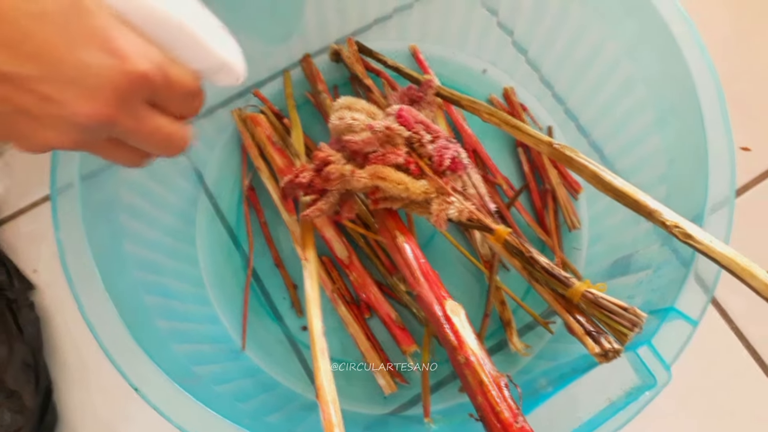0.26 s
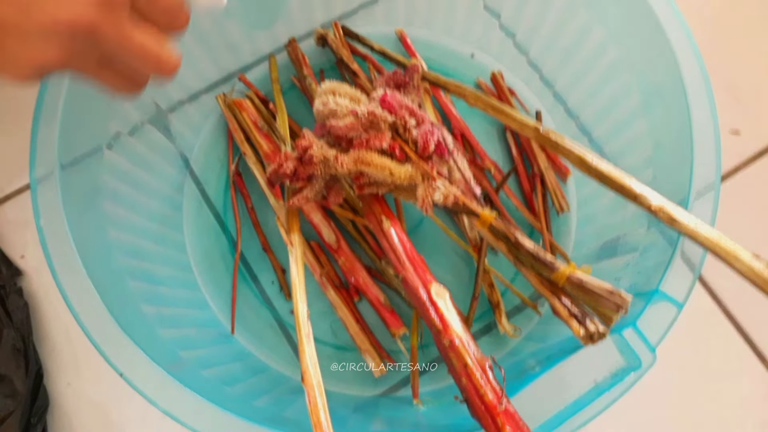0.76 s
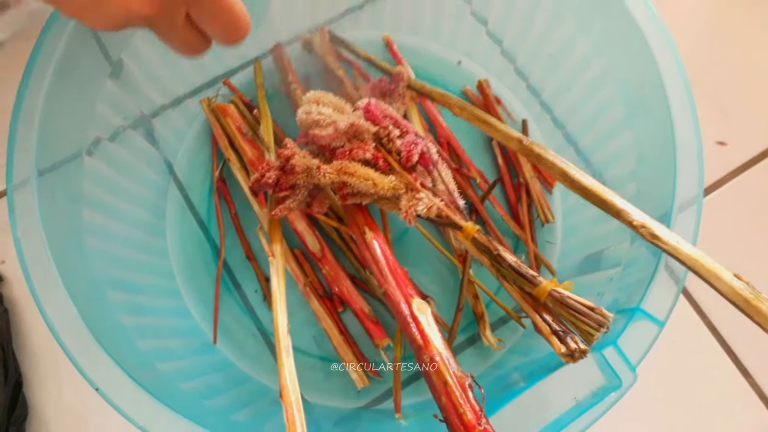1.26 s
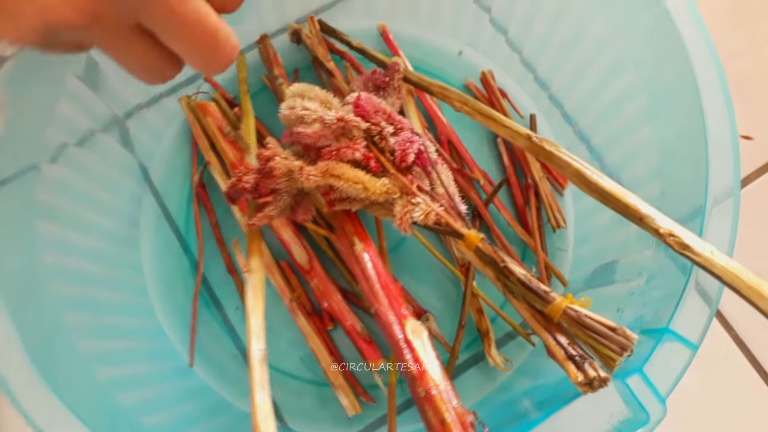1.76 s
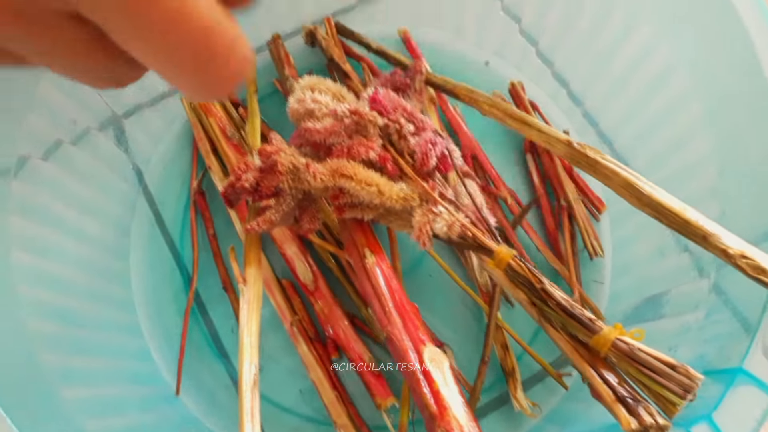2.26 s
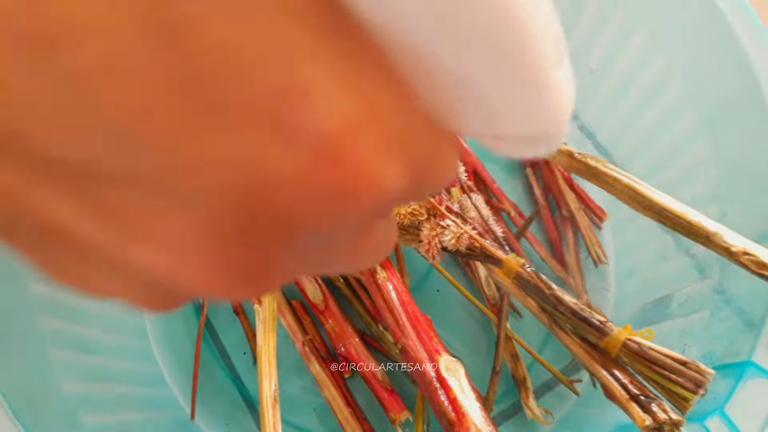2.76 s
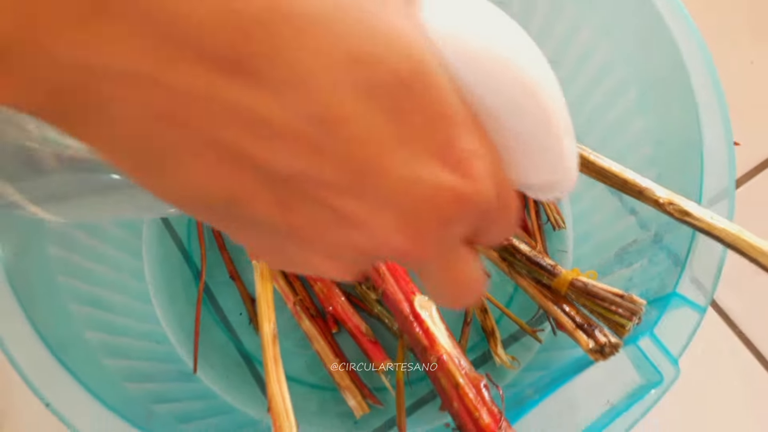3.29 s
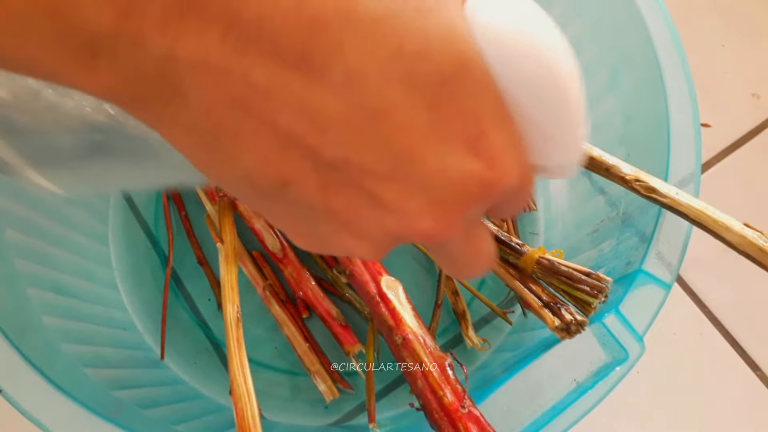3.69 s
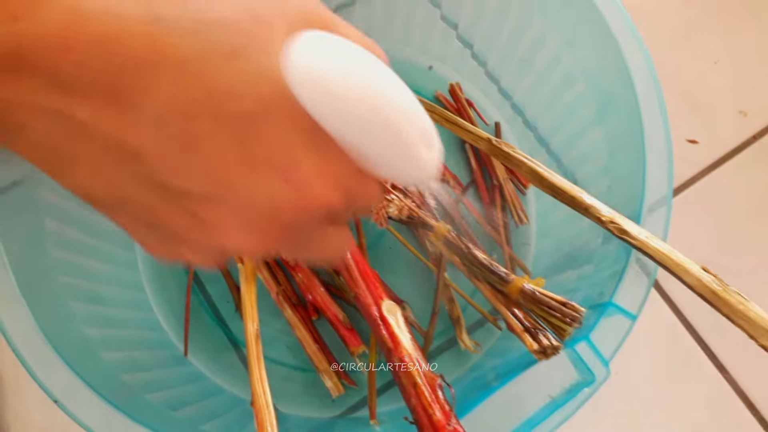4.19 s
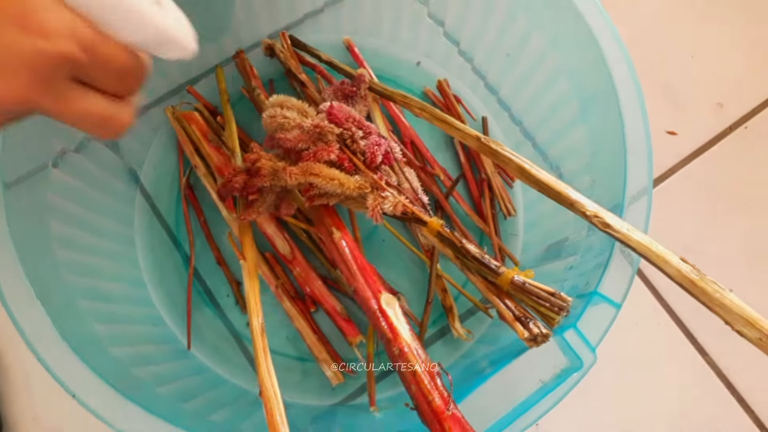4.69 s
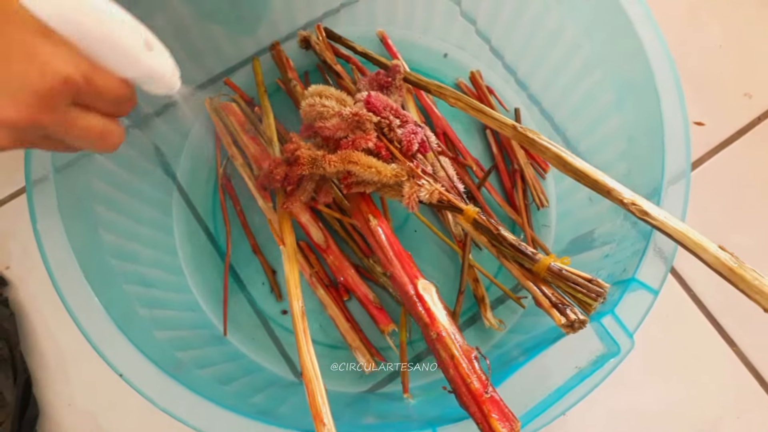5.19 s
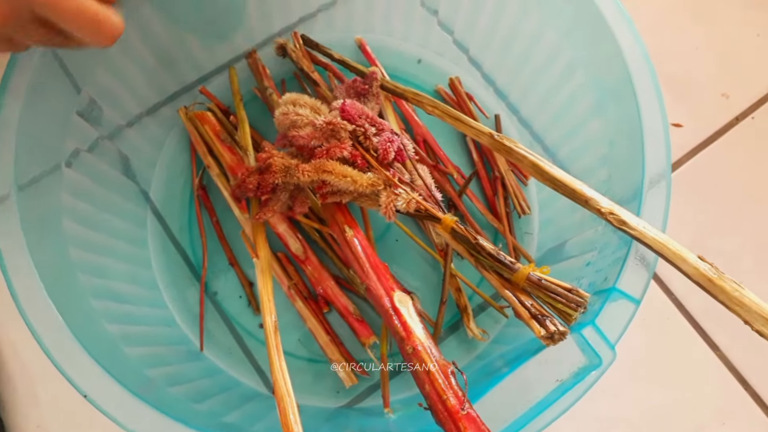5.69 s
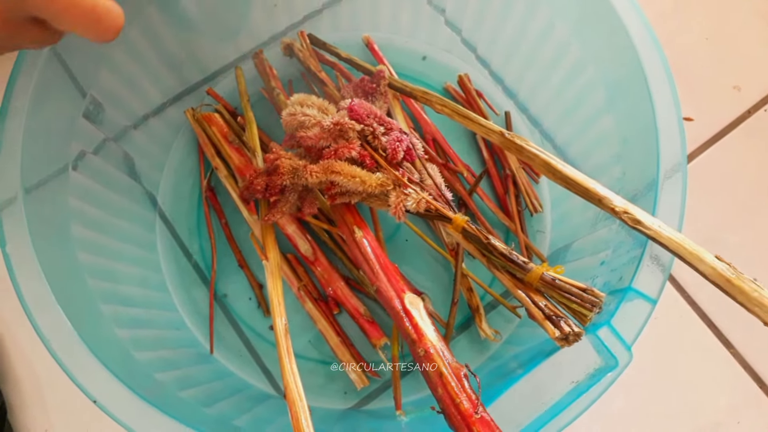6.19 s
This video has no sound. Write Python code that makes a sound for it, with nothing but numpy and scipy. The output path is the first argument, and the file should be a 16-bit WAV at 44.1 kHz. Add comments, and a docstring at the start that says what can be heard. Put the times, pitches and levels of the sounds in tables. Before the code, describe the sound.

A plastic trigger sprayer is pumped eighteen times, close to a phone microphone in a tiled room with a short hard echo. Squirts at 0, 0.4 and 0.8 s are the loudest and longest, nearly 0.2 s of bright, fizzing hiss. From 1.25 to 2.8 s six shorter, softer squirts follow about every 0.3 s, with sharp nozzle spits and hollow plastic knocks, strongest near 1.7 s. Between 2.8 and 3.4 s spraying pauses: clicks, rattles, a sucking refill hiss and a thin high whistle around 3.2 s. Squirts resume at 3.4 s, roughly every 0.35 s, until 6.3 s, with clacks at 4.2, 5.1, 5.4 and 6 s. Each sprays droplets that patter on stems and dully ring a plastic basin. Tiny stray drips tick throughout; faint room rumble and a distant wavering motor hum, changing pitch at 1.24 s, lie beneath.

```python
"""Bright hissing squirts come first: a plastic trigger bottle is pumped eighteen times, close to a phone in a tiled room.
Each squeeze gates bands of turbulence noise: the jet, and drops that patter on plant stems and ring a plastic basin.
Knocks excite decaying plastic modes with noise bursts on top; spits, ticks and refill whistles are narrower noise.
Stray drops are short sines; far off, coloured room noise and a wavering motor hum of sines lie underneath."""
import sys
import numpy as np
from scipy import signal
from scipy.fft import rfft, irfft
from scipy.io import wavfile
from scipy.ndimage import uniform_filter1d, map_coordinates

SR = 44100
rng = np.random.default_rng(int(sys.argv[2]) if len(sys.argv) > 2 else 0)


def to_wav(s):
    """Save 16-bit WAV."""
    ch = np.atleast_2d(s).T  # columns
    pcm = np.round(np.clip(ch, -1, 1) * 32767)  # PCM
    wavfile.write(sys.argv[1], SR, pcm.astype(np.int16))


N = 284445
HIGHEST_HZ = 0.45 * SR  # upper edge of the widest bands


def undb(db):
    """Level as the logarithm of amplitude: decibels to gain."""
    return 10 ** (np.asarray(db) / 20)


def unit(x):
    """Normalisation by mean power: scale to rms 1."""
    return x / np.sqrt(np.mean(x ** 2))


def decay(t, t60_s):
    """Exponential damping: the amplitude falls by 60 dB in t60_s."""
    return np.exp(-np.log(1000) * t / t60_s)


def coloured(spectrum):
    """Spectral shaping: white noise weighted by levels interpolated over log frequency."""
    hz, db = np.transpose(spectrum)
    f = np.arange(N // 2 + 1) * SR / N + 1
    gain = undb(np.interp(np.log(f), np.log(hz), db))
    return irfft(rfft(rng.standard_normal(N)) * gain, N)


def band(x, lo_hz, hi_hz, order=4):
    """Band limitation by a Butterworth band-pass."""
    return signal.sosfilt(signal.butter(order, [lo_hz, hi_hz], "band", fs=SR, output="sos"), x)


def flicker(rate_hz, db):
    """Random amplitude modulation: a gain that wanders by about db at the given rate."""
    k = int(SR / rate_hz)
    steps = np.repeat(rng.standard_normal(N // k + 1), k)
    return undb(db * 1.14 * uniform_filter1d(steps, k)[:N])


def add(track, s, x):
    """Superposition: mix x into the track at time s."""
    i = int(s * SR)
    track[i:i + len(x)] += x[:N - i]


def room_noise():
    """Broadband ambient noise: random pressure with a fixed spectrum and a slow swell."""
    # ambient noise spectrum: (frequency [Hz], relative density [dB per Hz])
    room_spectrum = [(15, -57), (25, -6), (169, 24.5), (351, 13.5), (485, 24), (555, 15), (707, 17),
                     (809, 19), (1770, -22), (2190, -14), (3030, -28), (7790, -18), (15700, -37)]
    room_db = -61.5
    return undb(room_db) * unit(coloured(room_spectrum)) * flicker(2.5, 6.0)


def rumble():
    """Low-frequency ambience: band-limited noise whose level follows a contour."""
    # low room rumble: (time [s], level [dB])
    rumble_levels = [(0, -51.5), (.5, -60.5), (1.2, -57.5), (1.26, -63), (2, -57.5), (2.5, -63.5),
                     (6.45, -68.5)]
    t = np.arange(N) / SR
    low_noise = unit(band(rng.standard_normal(N), 81, 376, order=2))
    return undb(np.interp(t, *np.transpose(rumble_levels))) * low_noise


def motor_hum():
    """Periodic radiation of a small motor: sines wavering in pitch and level."""
    # hum tones, a step higher after the third squeeze: (start [s], stop [s], frequency [Hz], level [dB])
    hum_tones = [(0, 1.24, 161.5, -64), (0, 1.24, 323, -67), (0, 1.24, 473.7, -61.5), (.5, 1.24, 576, -67),
                 (1.24, 6.45, 242.2, -66), (1.24, 6.45, 484.5, -68), (1.24, 6.45, 711.5, -60.5),
                 (1.85, 2.22, 163, -55)]
    out, t = np.zeros(N), np.arange(N) / SR
    for start, stop, hz, db in hum_tones:
        on = np.clip(np.minimum(t - start, stop - t) / 0.0055, 0, 1)
        level = np.sqrt(2) * undb(db) * on * flicker(12, 2)  # sqrt(2): the level is the rms
        phase = 2 * np.pi * hz * np.cumsum(flicker(15, .008)) / SR
        out += level * np.sin(phase)
    return out


def drips():
    """Damped oscillation: stray drops fall from the stems, each a brief ring at its own pitch."""
    out, t = np.zeros(N), np.arange(int(.02 * SR)) / SR
    drops_per_s = 35
    for when, pitch, size in rng.random((int(drops_per_s * N / SR), 3)):
        hz = 1500 * 4 ** pitch
        db = -62 - 4.0 * np.log(.15 + .85 * size)  # few drops are loud
        add(out, when * N / SR, undb(db) * np.sin(2 * np.pi * hz * t) * np.exp(-t * hz / 5))
    return out


def whistles():
    """Narrow-band flow noise: air drawn past the valve on the refill sings."""
    # refill whistles: (start [s], stop [s], centre [Hz], width [Hz], level [dB])
    whistle_events = [(3.18, 3.28, 4620, 270, -51), (5.68, 5.79, 3600, 130, -65),
                      (4.66, 4.71, 2115, 250, -61)]
    out = np.zeros(N)
    for start, stop, hz, width_hz, db in whistle_events:
        n = int((stop - start) * SR)
        tone = unit(band(rng.standard_normal(n), hz - width_hz / 2, hz + width_hz / 2, order=2))
        add(out, start, undb(db) * tone * np.hanning(n) ** 0.27)
    return out


def spits_and_ticks():
    """Transient excitation: bursts of noise around their own centre die away exponentially."""
    # the nozzle spits just before the jet: (time [s], level [dB])
    spit_events = [(1.2492, -19.5), (1.5297, -20), (1.8365, -20), (2.1136, -23), (2.4033, -19),
                   (5.161, -24), (5.498, -24), (5.818, -22.5), (6.1591, -29), (6.1696, -25)]
    # small ticks of trigger and spring: (time [s], level [dB], centre [Hz])
    tick_events = [(0.275, -34.5, 3950), (0.353, -56, 5630), (1.1002, -32, 5540), (1.1418, -35, 4600),
                   (1.196, -35.5, 4200), (1.2074, -45, 12200), (1.5052, -41, 5080), (2.9454, -40, 7700),
                   (3.0233, -24.5, 6200), (3.039, -32, 8140), (3.165, -33.5, 8260), (3.266, -37, 7230),
                   (3.589, -38, 7500), (3.602, -37, 6240), (3.6556, -43, 7800), (3.721, -43, 11500),
                   (4.3785, -40, 8400), (4.7294, -43, 7460), (5.1372, -42, 12800), (5.6945, -42, 6700),
                   (5.745, -45, 7000), (6.129, -49, 5760)]
    spit_hz, spit_t60_s, tick_t60_s = 12200, 0.015, 0.02
    events = [(s, db, spit_hz, spit_t60_s) for s, db in spit_events]
    events += [(s, db, hz, tick_t60_s) for s, db, hz in tick_events]
    out, t = np.zeros(N), np.arange(int(0.041 * SR)) / SR
    for s, db, hz, t60_s in events:
        noise = rng.standard_normal(len(t))
        centre = unit(band(noise, hz * 0.84, hz * 1.35, order=1))
        broad = unit(band(noise, 3700, HIGHEST_HZ, order=1))
        add(out, s, undb(db) * (centre + 0.2 * broad) * decay(t, t60_s))
    return out


def ring(part_db, t):
    """Modal superposition: where the blow lands sets how strongly each damped mode rings."""
    # plastic modes of bottle and trigger: (frequency [Hz], relative level [dB], t60 [s])
    bottle_modes = [(307, -4, .04), (415, -1, .035), (484, 0, .03), (590, -3, .025), (690, -2, .03),
                    (899, -4, .025), (1087, 0, .03), (1238, -4, .025), (1460, -6, .02), (1820, -4, .012),
                    (2070, 0, .018), (2250, -3, .014), (2580, -3, .014), (2890, 0, .014), (3340, -2, .012),
                    (3620, -3, .012)]
    # frequencies between which the part levels are interpolated: (frequency [Hz])
    parts_hz = [500, 1100, 2100, 3100]
    hz, db, t60_s = np.array(bottle_modes).T[:, :, None]
    level_chance, pitch_chance = rng.standard_normal((2, len(bottle_modes), 1))
    db = db + np.interp(np.log(hz), np.log(parts_hz), part_db) + np.clip(2.5 * level_chance, -4, 4)
    tones = np.sin(2 * np.pi * hz * (1 + 0.047 * pitch_chance) * t)
    return np.sum(undb(db) * decay(t, t60_s) * tones, 0)


def knocks():
    """Impact excitation: a blow and its loose rattle ring the bottle, with noise from contact and liquid."""
    # trigger and bottle knocks: (time [s], head level [dB],
    # then relative to the head: body [dB], shell [dB], trigger [dB], crack [dB])
    knock_events = [(0.684, -50, -12, -5, 5, 11.5), (0.694, -43, -10, -11, 6, -2),
                    (0.767, -50, -7, 7, 7, 3), (1.196, -47.5, -2, 0, 4, -14),
                    (1.479, -34, -7.5, 1.5, -19, 1), (1.492, -41.5, -4, -4, -6, -4),
                    (1.687, -20.5, -10.5, -3, -10, -9), (1.713, -30, -6, -29, -30, -27),
                    (1.726, -44, 3, -24, -19, -19), (1.78, -38.5, -11, 9, 13.5, 1),
                    (1.815, -27, -9, 5, -11, -3), (2.038, -36, -12, 5, -12, -9),
                    (2.085, -38, -6, 3.5, -12, -8), (2.184, -40, -23, 2.5, -6, 14),
                    (2.24, -32.5, -4.5, 1, -13, 3), (2.359, -24.5, -11, -2.5, -6, -1),
                    (2.381, -31, -6.5, -7, -5, -11), (2.573, -30, -9.5, -5, -20, -15),
                    (2.902, -51, -22, 14, 2, 20), (2.923, -44, -27, 7, -3, 10),
                    (2.968, -39.5, -3, -13, -19, 6), (2.976, -26.5, -12, 1, -25, 1.5),
                    (2.983, -42, -6, -20, -18, -14), (3.107, -42.5, -9, 0, -10, 11),
                    (3.113, -27.5, -15, -0.5, -22, 0.5), (3.12, -30.5, 5, -26, -20, -13),
                    (3.127, -43, 2, -16, -10, -6), (3.548, -53, -14, 10, -11, 5),
                    (3.667, -49, -9, 10, -5, 2), (3.719, -45.5, -3, -16, -15, -16),
                    (4.007, -41.5, -32, -20, -26, -3), (4.046, -60, -6.5, 16, -8, 14),
                    (4.211, -23.5, 3.5, -16, -20, -20), (4.304, -40, -16, -2, -17, 7),
                    (4.413, -57.5, -13, 8, 8, 16), (4.765, -45, -15, 1, -16, 2),
                    (5.057, -29.5, -8.5, 2, -21, -6), (5.067, -39, -1, 1, 2, 12),
                    (5.432, -25, -3, -7, -12, -8), (5.452, -27.5, -12, -1.5, -5, -1),
                    (5.65, -29.5, -4.5, -14, -22, -2), (5.764, -27.5, -8, -16, -29, -16),
                    (5.783, -38, -10, -4, -4, -2), (5.971, -25, -8, -10, -21, -17),
                    (6.034, -34, -2.5, -2, -7, -10), (6.321, -28.5, -13, -1.5, -16, -29),
                    (6.43, -41, -6, 4.5, -9, -0.5)]
    rattle_t60_s, looseness, contact_s, scrape_db = 0.2, 0.61, 0.00072, -14
    wash_db, wash_t60_s = -19.5, 0.19
    snap_db, snap_s, snap_db_per_db = 6.5, 0.0011, 0.37

    out, t = np.zeros(N), np.arange(int(.15 * SR)) / SR
    fade, push = decay(t, rattle_t60_s), np.minimum(t / contact_s, 1)

    def noise(lo_hz, hi_hz):
        """Band-limited random excitation at rms 1."""
        return unit(band(rng.standard_normal(len(t)), lo_hz, hi_hz, order=1))

    for s, db, body_db, shell_db, trigger_db, crack_db in knock_events:
        hit_chance, strength = rng.random((2, len(t)))
        # a few clear rebounds, 180 per second on average, over a fine chatter
        blows = looseness * fade * (2 * strength - 1) * ((hit_chance < 180 / SR) + 0.047)
        blows[0] = 1
        modes = ring([body_db, 0, shell_db, trigger_db], t) * push
        ringing = 1.254 * signal.fftconvolve(blows, modes)[:len(t)]
        # a short crack runs on into a scrape
        crack = noise(5000, 8700) * (np.exp(-t / 0.002) + undb(scrape_db) * fade) * push
        # the first contact is a broad snap, sharper in harder knocks
        loudest_db = max(0, shell_db, trigger_db)
        snap_gain = undb(snap_db + loudest_db + snap_db_per_db * (db + 22.5))
        snap = snap_gain * noise(440, 2700) * np.exp(-t / snap_s) * push
        # the knock shakes the liquid in the bottle
        wash = undb(wash_db) * noise(530, 4000) * decay(t, wash_t60_s) * push
        add(out, s, undb(db) * (ringing + undb(crack_db) * crack + wash + snap))
    return band(out, 276, HIGHEST_HZ, order=3)  # a small bottle radiates no bass


def flow():
    """Power addition: stroke, dribble and refill hiss combine into gains of the five spray layers."""
    # squeezes: (valve opens [s], mid-stroke [s], valve shuts [s], mist at each of the three [dB, dB, dB],
    # relative to the mist: jet [dB], fizz [dB], patter [dB], basin ring [dB];
    # change of patter and basin while the first drops travel [dB], drops in the dribble [dB],
    # refill hiss after the shut [dB], refill hiss later, at most 0.26 s on [dB])
    squeezes = [(0.002, 0.103, 0.19, -17, -16.5, -19, -11, -16.5, -29.5, -38, 5.5, -23, -56, -68),
                (0.419, 0.502, 0.6, -19, -14.5, -16.5, -12, -16.5, -25.5, -33, -9.5, -7, -56, -70),
                (0.829, 0.894, 1.027, -20, -13.5, -19, -12, -16, -28.5, -45, -1, -16, -54, -69),
                (1.261, 1.325, 1.39, -29.5, -28, -31, -1.5, -12, -18, -18, -3, -4, -66, -66.5),
                (1.545, 1.603, 1.668, -30, -28.5, -28.5, 0, -13, -16.5, -18, -3.5, 2, -70, -64),
                (1.847, 1.906, 1.968, -28.5, -26.5, -28, -3.5, -15, -24.5, -20, 0, -0.5, -62, -63.5),
                (2.132, 2.171, 2.235, -23, -28.5, -21.5, -9, -19.5, -30, -18, -5.5, -0.5, -61.5, -57),
                (2.416, 2.48, 2.544, -24.5, -22.5, -25.5, -8, -16.5, -17, -18, -17, -1, -54.5, -55),
                (2.71, 2.757, 2.781, -24.5, -20.5, -22.5, -7, -18, -20.5, -26, -8.5, -7, -55.5, -48),
                (3.384, 3.45, 3.537, -30.5, -28.5, -32, -0.5, -13, -18.5, -12.5, -6, -16, -60, -75),
                (3.739, 3.834, 3.903, -31.5, -27, -29, -3, -15.5, -18.5, -24, -7, -14, -62, -74.5),
                (4.114, 4.17, 4.268, -27.5, -23.5, -24, -4.5, -18, -19, -22, -10, -8, -58.5, -73),
                (4.463, 4.522, 4.604, -28, -26.5, -31.5, -5.5, -16, -18, -10.5, -21.5, -15, -67, -72),
                (4.809, 4.879, 4.946, -28.5, -28, -29, -6, -15.5, -22.5, -21, -8.5, -15, -69.5, -64),
                (5.176, 5.239, 5.316, -29.5, -28.5, -27.5, -3.5, -14, -14, -22, -18, -3, -72, -61),
                (5.515, 5.566, 5.62, -31.5, -28, -28, -4, -14, -20, -25, -1.5, 0, -59, -69),
                (5.836, 5.895, 5.976, -28, -25, -28.5, -5.5, -16.5, -18.5, -23, -8.5, -2, -60.5, -72),
                (6.174, 6.234, 6.314, -29, -28, -29.5, -5, -17, -21.5, -21.5, -3.5, -7, -66, -68.5)]
    # refill hiss in the pause after the ninth squeeze: (time [s], level [dB])
    long_refill = [(2.885, -50), (3.011, -65.5), (3.065, -58.5), (3.09, -63.5), (3.229, -55), (3.297, -64),
                   (3.376, -71)]
    # dribble, one relative level per layer: (mist [dB], jet [dB], fizz [dB], patter [dB], basin [dB])
    dribble_colour = [2, -5, -5.5, -1, -12]
    # refill hiss, one relative level per layer: (mist [dB], jet [dB], fizz [dB], patter [dB], basin [dB])
    refill_colour = [-0.5, 4, 3.5, 2, -3]
    # the valve pops open, settles from the extra level in as long again, and snaps shut
    open_s, open_db, shut_s = .004, 3, 0.011
    sag_s, sag_db = 0.016, -5  # the pressure sags at the end of the stroke
    arrival_s = 0.045  # the patter changes as the first drops land
    dribble_start_db, dribble_db_per_s = -13.5, 420  # what is left in the nozzle dies away

    t = np.arange(N) / SR
    power = np.zeros((5, N))
    rows = np.array(squeezes)
    refill = []
    for row, following in zip(rows, list(rows[1:, 0]) + [N / SR]):
        opens, mid, shuts, first_db, mid_db, last_db = row[:6]
        travel_db, drops_db, early_db, late_db = row[10:]
        stroke_db = np.interp(
            t,
            [opens - open_s, opens, opens + open_s, mid, shuts - sag_s, shuts, shuts + shut_s],
            [first_db - 14, first_db + open_db, first_db, mid_db, last_db, last_db + sag_db, last_db - 27])
        colour = np.array([0, *row[6:10]])[:, None] + 0 * t
        colour[3:] += travel_db * np.exp(-np.maximum(t - opens, 0) / arrival_s)
        power += undb(2 * (stroke_db + colour)) * ((t > opens - open_s) & (t < shuts + shut_s))

        dribble_db = last_db + dribble_start_db - dribble_db_per_s * np.maximum(t - shuts, 0)
        # the last drops reach mainly the fizz, patter and basin layers
        colour = np.array(dribble_colour) + drops_db * np.array([0, 0.066, 0.77, 0.98, 1])
        power += undb(2 * (dribble_db + colour[:, None])) * (t > shuts)
        refill += [(shuts, early_db), (min(following, shuts + .26) - open_s, late_db)]

    pause_start, pause_stop = long_refill[0][0], long_refill[-1][0]
    outside_pause = [p for p in refill if not pause_start < p[0] < pause_stop]
    refill = sorted(outside_pause + list(long_refill))
    refill_db = np.interp(t, *np.transpose(refill)) + np.array(refill_colour)[:, None]
    sputter = flicker(30, 2.3) ** 2
    power += sputter * undb(2 * refill_db)
    return np.sqrt(power)


def spray():
    """Turbulent jet noise: bands of hiss, with drops that patter on the stems and ring the basin."""
    # spray spectrum: (frequency [Hz], relative density [dB per Hz])
    spray_spectrum = [(290, -54), (500, -17.5), (530, -20.5), (727, -17), (816, -22.5), (1240, -19),
                      (2730, -20.5), (3250, -23.5), (3590, -19), (4090, -15.5), (4520, -16), (8400, -2.5),
                      (9560, -7), (14100, 3.5), (15600, -1)]
    # basin resonances under the drops: (centre [Hz], width [Hz], relative level [dB])
    basin_modes = [(1110, 420, -15.5), (2146, 410, -10)]
    patter_top_hz, fizz_top_hz, mist_foot_hz = 2990, 5490, 10820
    hiss = coloured(spray_spectrum)
    mist = unit(band(hiss, mist_foot_hz, HIGHEST_HZ)) * flicker(150, 1.0)
    jet = unit(band(hiss, fizz_top_hz, mist_foot_hz)) * flicker(130, 0.48) * flicker(25, 1.44)
    fizz = unit(band(hiss, patter_top_hz, fizz_top_hz)) * flicker(90, 0.57) * flicker(25, 0.63)
    patter = unit(band(hiss, 625, patter_top_hz)) * flicker(60, 1.52) * flicker(20, 2.0)
    drops = rng.standard_normal(N) * flicker(200, 3.3) * flicker(20, 1.9)
    rings = [undb(db) * band(drops, hz - w / 2, hz + w / 2, order=2) for hz, w, db in basin_modes]
    basin = undb(-3.0) * unit(sum(rings))
    layers = np.sum(flow() * [mist, jet, fizz, patter, basin], 0)
    # the break-up of the jet makes all bands flutter together
    return flicker(40, 1.0) * layers


def bounce(x):
    """Comb interference: near reflections whose path lengths drift as the hand moves."""
    # the jet again off basin and tiles: (mean delay [s], level [dB])
    reflections = [(.0009, -15), (.0023, -11), (.0041, -13.5)]
    n = np.arange(N)
    out = x
    for delay_s, db in reflections:
        delayed_n = n - delay_s * SR * flicker(3, 1.504)
        out = out + undb(db) * map_coordinates(x, [delayed_n], order=3)
    return out


def tile_echo(near):
    """Diffuse reverberation: convolution with an exponentially decaying noise tail of the tiles."""
    echo_t60_s, echo_db = 0.14, -15
    t = np.arange(int(.4 * SR)) / SR
    tail = rng.standard_normal(len(t)) * decay(t, echo_t60_s) * (t > .004)
    tail /= np.sqrt(np.sum(tail ** 2))
    return undb(echo_db) * signal.fftconvolve(near, tail)[:N]


def scene():
    """Superposition of direct sound, echo and background, straight ahead: both channels are the same."""
    background = room_noise() + rumble() + motor_hum()
    near = drips() + whistles() + spits_and_ticks() + knocks() + bounce(spray())
    return np.tile(near + tile_echo(near) + background, (2, 1))


def record(dry):
    """Band limitation: the phone cuts the top with a steep elliptic low-pass."""
    top_hz = 15750
    return signal.sosfilt(signal.ellip(10, .2, 70, top_hz, fs=SR, output="sos"), dry)


dry = scene()
out = record(dry)
to_wav(out)
```